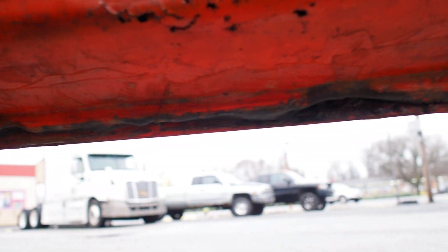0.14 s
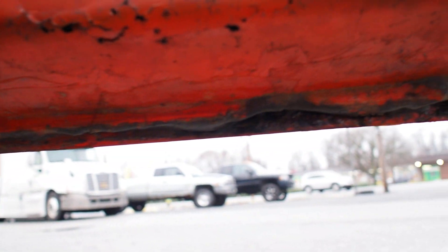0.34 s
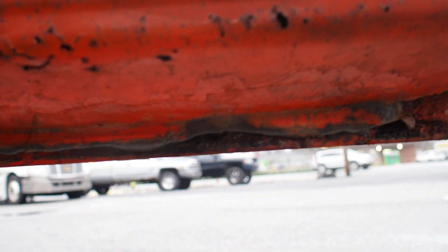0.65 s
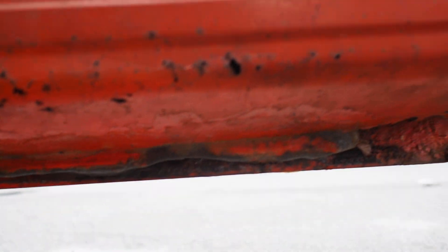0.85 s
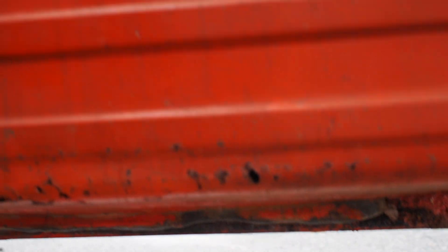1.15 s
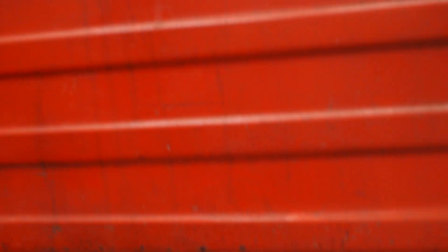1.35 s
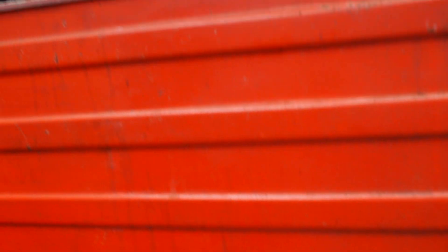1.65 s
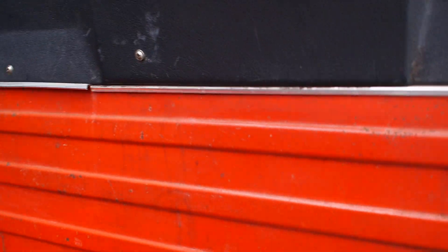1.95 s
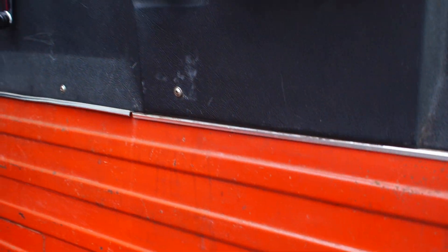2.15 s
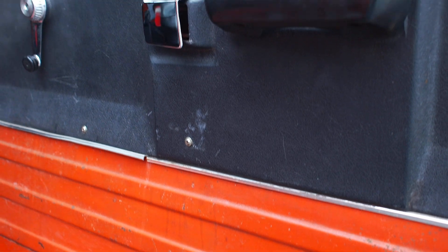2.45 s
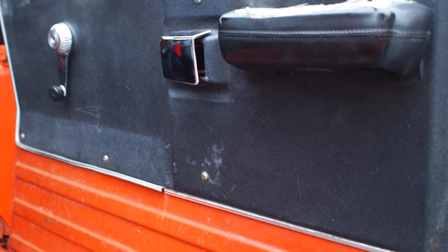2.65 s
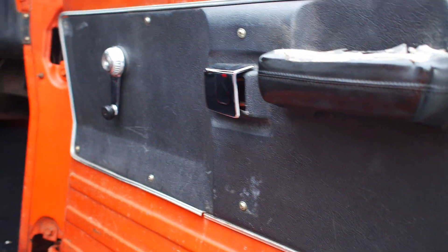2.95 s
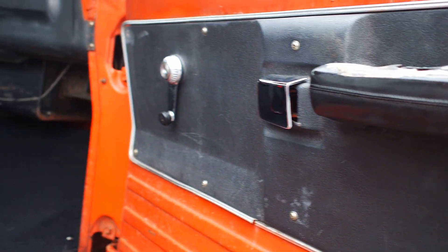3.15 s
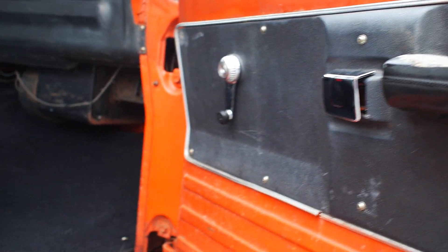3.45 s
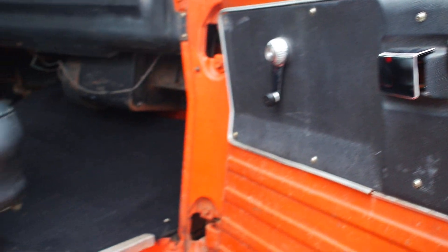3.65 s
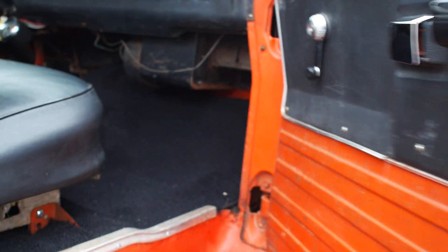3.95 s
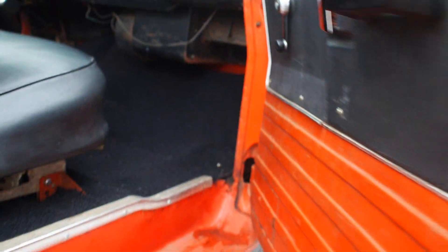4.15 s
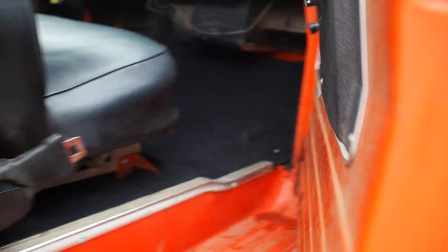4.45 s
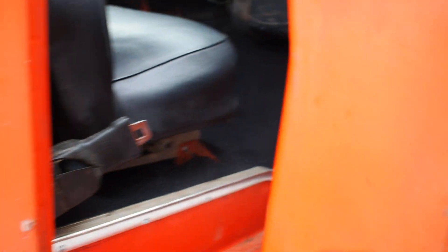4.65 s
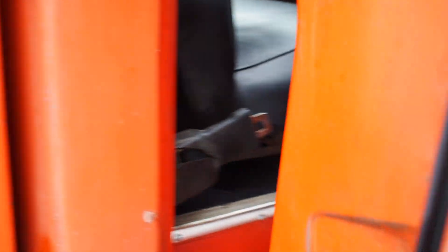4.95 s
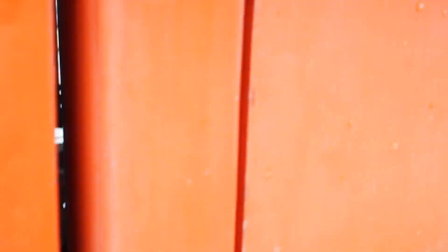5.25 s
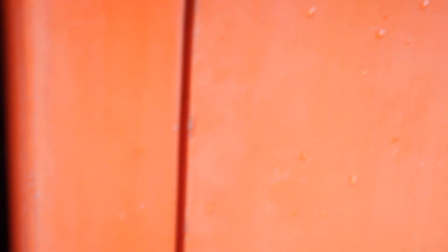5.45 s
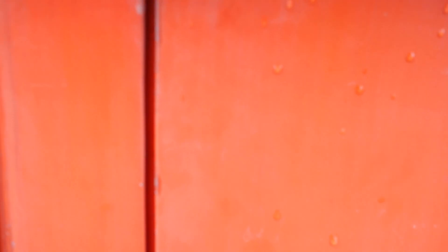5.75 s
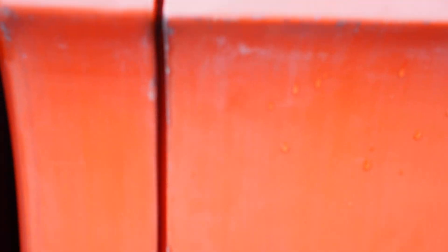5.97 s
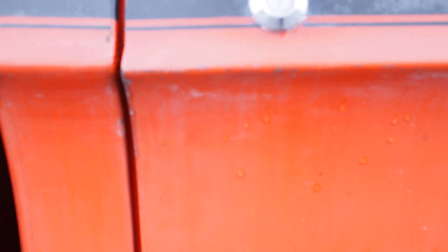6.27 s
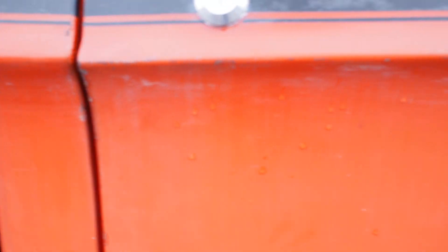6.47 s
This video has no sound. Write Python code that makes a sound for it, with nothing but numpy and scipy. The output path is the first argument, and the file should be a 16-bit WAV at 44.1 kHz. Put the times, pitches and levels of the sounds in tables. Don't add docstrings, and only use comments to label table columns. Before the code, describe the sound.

A handheld stereo microphone drifts close along a parked truck while its V8 idles unevenly, deep exhaust pulses centred and airy engine hiss spread wider. Small tappet chirps flicker early on. A sharp door click dips the level slightly; a heavy door slam with tinny shudder and inner rattle then ducks the engine deeply before it swells back.

```python
import sys
import numpy as np
from scipy import signal
from scipy.io import wavfile
from scipy.ndimage import uniform_filter1d

SR = 44100
rng = np.random.default_rng(int(sys.argv[2]) if len(sys.argv) > 2 else 0)


def master_out(mix):
    frames = np.transpose(np.atleast_2d(mix))
    ceiling = np.clip(frames, -1, 1)
    pcm = np.round(ceiling * 32767).astype(np.int16)
    wavfile.write(sys.argv[1], SR, pcm)


def convert_level_to_amplitude(level_db):
    exponent = np.asarray(level_db, float) / 20
    return 10 ** exponent


N = 291501

# time in seconds, speed in rpm.
CRANK_SPEED = [(0, 1071.8), (0.7, 1057.8), (1, 1060.6), (1.3, 1067.0), (1.85, 1035.9), (2.05, 1040.2),
               (2.35, 1060.5), (3, 1042.9), (3.3, 1051.2), (3.8, 1055.4), (4.2, 1043.3), (4.6, 1058.4),
               (5, 1073.5), (5.45, 1044.6), (5.8, 1057.1), (6.25, 1032.8), (6.6, 1037.5)]
# pitch in Hz, width in Hz, travel time in ms.
PIPES = [(100.0, 33.0, 11.5), (166.0, 25.0, 3.0), (179.0, 26.0, 8.6), (260.0, 25.0, 2.0),
         (296.0, 52.0, 11.2), (334.0, 25.0, 10.2), (409.0, 90.0, 2.7), (530.0, 25.0, 12.1),
         (607.0, 25.0, 0.6)]
CYLINDER_PUSHES = [(15, -21, 37, -4, 7, 52, -20, 24), (38, -50, -48, 18, -73, -26, 8, -80),
                   (-65, -8, -8, 47, -10, 52, -22, 18), (63, 20, 74, 6, -13, 10, -2, 10),
                   (15, -1, 6, 26, 14, 7, 9, 10), (36, 1, 37, 1, 23, -7, 17, -2),
                   (6, -4, 6, 0, -5, -3, 1, -1), (-2, 6, 5, 1, 2, 0, 2, -10), (9, -2, 0, 1, 0, -3, 4, -1)]
PLACE_TIMES = [
    .4,
    1.5,
    2.6,
    3.8,
    5,
]
REACH = [(0.55, 0.79, 0.88, 1.0, 0.8), (1.0, 0.8, 0.65, 0.66, 0.59), (0.8, 0.94, 1.0, 0.75, 0.73),
         (0.76, 0.37, 0.3, 0.8, 1.0), (0.22, 0.22, 0.51, 1.0, 0.76), (0.56, 0.3, 0.94, 1.0, 0.52),
         (0.58, 0.19, 1.0, 0.8, 0.36), (1.0, 0.73, 0.91, 0.86, 0.1), (0.97, 0.73, 1.0, 0.66, 0.34)]
DETOUR = [(-0.43, 0.05, 0.09, 0.04, 0.15), (0.3, 0.27, 0.47, 0.46, 0.14), (0.9, 0.35, 0.41, 0.51, -0.01),
          (0.46, -0.26, -1.22, -0.97, -0.18), (0.8, 0.34, -0.05, 0.37, 0.89),
          (1.12, 1.08, -0.3, 0.12, 0.88), (0.56, 0.44, -0.12, 0.17, 0.81),
          (-0.06, -0.31, -0.05, 0.09, 0.34), (-0.18, -0.52, -0.09, 0.14, 0.67)]
# time in seconds, nearness to the truck in dB,
# view of the engine bay in dB.
MICROPHONE_DRIFT = [(0, 0, -0.5), (.6, -1, 1.5), (1.05, -0.5, 0), (1.5, 1, 1), (1.95, .4, -0.7),
                    (2.4, -0.5, 1.5), (2.8, 1, 0), (3.5, 0.04, 1.5), (3.8, -0.3, 2), (4.05, 1, -1),
                    (4.45, 0.8, -3), (4.9, 1.1, -4.5), (5.2, 0.1, -4), (5.7, 0.5, -3), (6.2, 1.5, -6),
                    (6.35, .3, -4), (6.6, 2.5, -5)]
# start in seconds, depth in dB, fall in seconds,
# recovery in dB per second.
GAIN_CLAMPS = [
    (2.885, 5, 0.04, 8),
    (5.21, 19.5, 0.15, 7),
]
# pitch in Hz, likeness from -1 to 1.
LEFT_RIGHT_LIKENESS = [(60, .998), (480, .993), (950, .985), (1890, .96), (2800, .88), (3770, .68),
                       (5300, .36), (7520, .2), (11000, -.08), (15000, -.15)]

# pitch in Hz, level in dB per Hz.
HISS_COLOUR = [(1180, -29), (2000, -6.5), (2240, -7), (2980, -4.5), (3310, -4), (4380, -8.5), (6470, -10),
               (7700, -7.5), (8780, -10), (10400, -22.5), (11600, -18), (13400, -24), (15000, -35),
               (16000, -45)]
RUMBLE_COLOUR = [(30, -56), (66, -2), (100, -8), (170, 5), (220, -4.5), (280, -7), (350, -13.5),
                 (500, -40.5)]
CLATTER_COLOUR = [(240, -9), (355, 1), (410, -10), (445, -2), (490, -6), (560, -6), (620, -1), (725, -25.5),
                  (822, -5.5), (1160, -8), (1270, -9.5), (1870, -10), (2220, -20.5), (2600, -18),
                  (3380, -52)]
# pitch in Hz, width in Hz, level in dB.
WHINES = [(352.6, 14, -7), (530, 8.3, -15.5), (615, 13, -12), (810, 6, -14.5), (939, 45, -13),
          (1268, 7.2, -16), (1326, 30, -17.5), (1510, 6.3, -17)]
# time in seconds, peak in dB.
TAPPET_CHIRPS = [(0.2917, -33), (0.5194, -45), (0.6294, -36), (0.7327, -34), (0.8614, -31), (0.9742, -34),
                 (1.1802, -29), (1.475, -35), (1.5434, -28.5), (1.6694, -32), (1.7878, -39), (2.0078, -37),
                 (2.1211, -36), (3.3034, -33), (3.7943, -31), (4.3794, -35)]

# start in seconds, peak in dB, ring in Hz,
# upper ring in Hz, treble in dB.
CLICKS = [
    (2.472, -10, 3170, 5300, 0.5),
    (2.889, 0.5, 2990, 6200, -10),
    (5.2132, -.1, 3200, 7040, 1.1),
    (5.288, -2, 2720, 3340, -11),
    (6.2815, -25.5, 2660, 5370, -1),
]
# start in seconds, peak in dB.
ROD_BOUNCES = [(2.898, -12), (2.9045, -11), (2.912, -16), (2.923, -18), (5.227, -12), (5.238, -12),
               (5.2618, -6), (5.3116, -17.5), (5.335, -26), (5.3595, -22), (5.3632, -24), (5.385, -30),
               (5.4076, -34), (5.4204, -32), (5.4277, -30), (5.45, -32), (5.4735, -36), (5.4977, -33),
               (5.5024, -37), (5.5228, -38), (5.5443, -37), (5.5664, -34), (5.686, -35), (5.7713, -38),
               (5.7972, -38), (5.8183, -29.5), (5.8463, -36), (5.8694, -27)]
# start in seconds, level in dB, time to fade by 60 dB in seconds,
# treble level in dB, treble time to fade by 60 dB in seconds.
SKIN_SHUDDERS = [
    (2.893, -19.5, 0.24, -31, 0.12),
    (5.203, -20, 0.14, -27, .1),
    (5.214, -11.5, 0.21, -9, 0.066),
    (5.226, -14.5, 0.18, -10, 0.064),
    (5.238, -17, 0.18, -15, 0.12),
    (5.263, -20.5, 0.18, -33, 0.055),
    (5.2865, -20, 0.28, -25, 0.088),
]
# start in seconds, level in dB, time to fade by 60 dB in seconds.
DOOR_BOOMS = [
    (5.214, -12.5, 0.37),
    (5.241, -12.5, 0.47),
    (5.28, -8.5, 0.33),
]
# pitch in Hz, level in dB, time to fade by 60 dB in seconds.
PANEL_TONES = [(1060, -17, 0.11), (1500, -17, .1), (1805, -9, 0.11), (2566, -20, 0.12)]
# pitch in Hz, level in dB per Hz.
SKIN_COLOUR = [(290, -36), (500, 3), (575, -13), (662, -4.5), (1090, 7), (1480, 3.5), (1860, 6.5),
               (2210, -5), (2620, 0.5), (5500, -9), (7150, -42), (12100, -120)]
SKIN_TREBLE_COLOUR = [(3240, -43), (5500, -8), (8480, 4), (10400, -11), (10700, -7), (12600, -9),
                      (15400, -14), (16000, -24)]
ROD_COLOUR = [(1500, -11), (2200, -7), (3000, -4), (3800, -11), (4600, -19), (6000, -46)]
CRACK_COLOUR = [(3500, -8), (4600, 1), (5400, 1), (6200, -6), (7600, -6), (9200, -14), (13000, -34),
                (16000, -35)]
BOOM_COLOUR = [(60, -26), (110, -4), (200, 7), (290, 5), (430, 1), (560, -8.5), (800, -52)]

EXHAUST_DB, CLATTER_DB, HISS_DB = -11, -24.5, -30.5
SHUT_S = 5.3


def evened(x):
    return x / np.sqrt(np.mean(x ** 2) + 1e-20)


def read(points, hz):
    f, value = np.transpose(points)
    return np.interp(np.log(hz + 1), np.log(f + 1), value)


def add(mix, s, sound):
    part = mix[..., round(s * SR):][..., :sound.shape[-1]]
    part += sound[..., :part.shape[-1]]


def noise(colour, count, patchy_db=2.5):
    hz = np.fft.rfftfreq(1024, 1 / SR)
    a, b, c, d, patches = rng.standard_normal((count // 256 + 5, 513, 5)).T
    patches = uniform_filter1d(patches, size=10, axis=0)
    patches = evened(uniform_filter1d(patches, size=12, axis=1))
    same = np.clip(read(LEFT_RIGHT_LIKENESS, hz), -1, 1)[:, None]
    left = a + 1j * b
    right = same * left + np.sqrt(1 - same ** 2) * (c + 1j * d)
    level_db = read(colour, hz)[:, None] + patchy_db * patches
    z = np.array([left, right]) * convert_level_to_amplitude(level_db)
    return evened(signal.istft(z, nperseg=1024, noverlap=768)[1][:, :count])


def ring(hz, t60, count):
    t = np.arange(count) / SR
    return convert_level_to_amplitude(-60 * t / t60) * np.sin(2 * np.pi * hz * t)


def burst(colour, db, t60, rise=0.001, count=6000):
    t = np.arange(count) / SR
    return noise(colour, count=count, patchy_db=1.0) * convert_level_to_amplitude(db - 60 * t / t60) * np.minimum(t / rise, 1)


def whine(hz, width):
    r = np.exp(-np.pi * width / SR)
    drift = signal.lfilter([1 - r], [1, -r], rng.standard_normal(N) + 1j * rng.standard_normal(N))
    return evened((drift * np.exp(2j * np.pi * hz * np.arange(N) / SR)).real)


def clamp_db(t):
    total = 0
    for s, db, fall, climb in GAIN_CLAMPS:
        falling = db * (t - s) / fall
        climbing = db - climb * (t - s - fall)
        total = total + np.clip(np.minimum(falling, climbing), 0, None)
    return -total


def engine_clatter(t):
    out = noise(CLATTER_COLOUR, count=N, patchy_db=1.5)
    for hz, width, db in WHINES:
        out = out + convert_level_to_amplitude(db) * whine(hz, width)
    hum_swell = np.clip((t - SHUT_S) / 0.85, 0, 1)
    return out + convert_level_to_amplitude(-6) * whine(635, 9) * hum_swell


def tappet(t):
    out = np.zeros(N)
    waver = evened(uniform_filter1d(rng.standard_normal(N), size=150))
    chirp = np.sin(2 * np.pi * np.cumsum(3270 + 60 * waver) / SR)
    u = t[:3000] / .017
    swell = 2.7 * u * np.exp(-u)
    for s, db in TAPPET_CHIRPS:
        add(out, s - .008, convert_level_to_amplitude(db - .7) * chirp[round(s * SR):][:3000] * swell)
    return out


def clicks(out):
    for s, db, hz, upper_hz, treble_db in CLICKS:
        t60 = .009 - .0004 * treble_db
        rings = ring(hz, t60, count=3000) + convert_level_to_amplitude(1.4 * treble_db) * ring(upper_hz, t60, count=3000)
        add(out, s, convert_level_to_amplitude(db - 8) * ring(6940, .0011, count=300))
        add(out, s, burst(ROD_COLOUR, db - 5, 1.2 * t60, count=3000))
        crack = burst(CRACK_COLOUR, db + treble_db - 2.0, 1.23 * t60, count=3000)
        add(out, s, convert_level_to_amplitude(db - 2.0) * rings + crack)


def rod_rattle(out):
    for s, db in ROD_BOUNCES:
        rod = convert_level_to_amplitude(db + 0.5) * ring(3100, .006, count=3000)
        snap = burst(ROD_COLOUR, db, 0.017, count=3000)
        crack = burst(CRACK_COLOUR, db - 9.5, 0.024, count=3000)
        add(out, s, rod + snap + crack)


def door_body(out):
    for s, db, t60, treble_db, treble_t60 in SKIN_SHUDDERS:
        add(out, s, burst(SKIN_COLOUR, db, t60, count=SR // 2))
        add(out, s, burst(SKIN_TREBLE_COLOUR, treble_db, treble_t60, count=SR // 2))
    for s, db, t60 in DOOR_BOOMS:
        add(out, s, burst(BOOM_COLOUR, db, t60, rise=0.012, count=SR // 2))
    for hz, db, t60 in PANEL_TONES:
        add(out, 5.214, convert_level_to_amplitude(db) * ring(hz, t60, count=SR // 4))


def door():
    out = np.zeros((2, N))
    clicks(out)
    rod_rattle(out)
    door_body(out)
    middle = out.mean(0)
    return middle + 0.49 * (out - middle)


def manifold_whoop(cycles, t):
    since = (cycles + 0.313) % 1 - 1 / 2
    whoop = np.sin(2 * np.pi * np.cumsum(598 + 330 * since) / SR) * np.exp(-(since / 0.091) ** 2)
    return whoop * np.clip((t - 1.4) / 0.64, .5, 1)


def exhaust(cycles, t):
    lead = SR // 2
    running = np.r_[cycles[0] - cycles[lead:0:-1], cycles]
    firing = np.floor(8 * running).astype(int)
    at = np.flatnonzero(np.diff(firing)) + 1

    paths = REACH * np.exp(-2j * np.pi * np.array(PIPES)[:, :1] * DETOUR / 1000)
    reach = np.array([np.interp((at - lead) / SR, PLACE_TIMES, row) for row in paths])

    pushes = np.array(CYLINDER_PUSHES)[:, firing[at] % 8]
    chance = rng.standard_normal((len(at), 1 + len(PIPES))).T
    spread = pushes.std(1)[:, None]
    pushes = pushes * (1 + .07 * chance[0]) + .09 * spread * chance[1:]
    pushes = pushes * reach
    pushes[-1] *= .6

    out, u = np.zeros(N + lead), t[:SR // 4]
    for push, (hz, width, ms) in zip(pushes, PIPES):
        train = np.zeros(N + lead + SR, complex)
        train[at + round(ms * SR / 1000)] = push
        swell = (np.pi * width) ** 2 * u * np.exp(-np.pi * width * u)
        sung = signal.oaconvolve(train, swell * np.exp(2j * np.pi * hz * u))[:N + lead].imag
        out += convert_level_to_amplitude(1.54 * (hz > 240)) * sung
    return evened(out[lead:])


def engine():
    t = np.arange(N) / SR
    cycles = np.cumsum(np.interp(t, *np.transpose(CRANK_SPEED))) / 120 / SR
    s, *columns = np.transpose(MICROPHONE_DRIFT)
    near_db, view_db = (np.interp(t, s, c) for c in columns)
    near_db = near_db + clamp_db(t)
    breath_db = 0.27 * np.cos(2 * np.pi * (cycles - .3)) + 0.2 * np.cos(2 * np.pi * 8 * cycles)

    clatter_db = near_db + view_db + CLATTER_DB + breath_db + 3.5 * (t > SHUT_S)
    hiss_db = near_db + 0.85 * view_db + HISS_DB + 3.5 * breath_db

    low = exhaust(cycles, t) + convert_level_to_amplitude(-14.0) * noise(RUMBLE_COLOUR, count=N)
    low += convert_level_to_amplitude(-10.0) * manifold_whoop(cycles, t)
    out = low * convert_level_to_amplitude(near_db + EXHAUST_DB) + engine_clatter(t) * convert_level_to_amplitude(clatter_db)
    out += noise(HISS_COLOUR, count=N, patchy_db=1.48) * convert_level_to_amplitude(hiss_db)
    return out + tappet(t)


def scene():
    return door() + engine()


def band_limit(x):
    return signal.sosfilt(signal.butter(12, 16220, fs=SR, output="sos"), x)


def record(dry):
    cut = signal.sosfilt(signal.butter(3, 60, "high", fs=SR, output="sos"), dry)
    mix = 1.215 * np.tanh(cut / 1.2)
    return band_limit(mix)


dry = scene()
out = record(dry)
master_out(out)
```